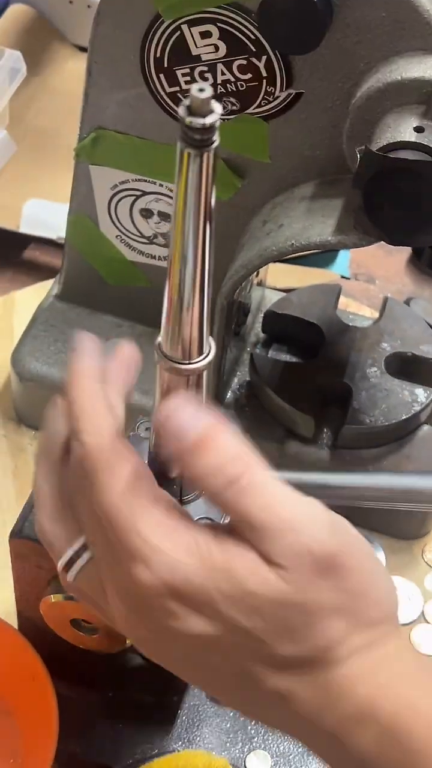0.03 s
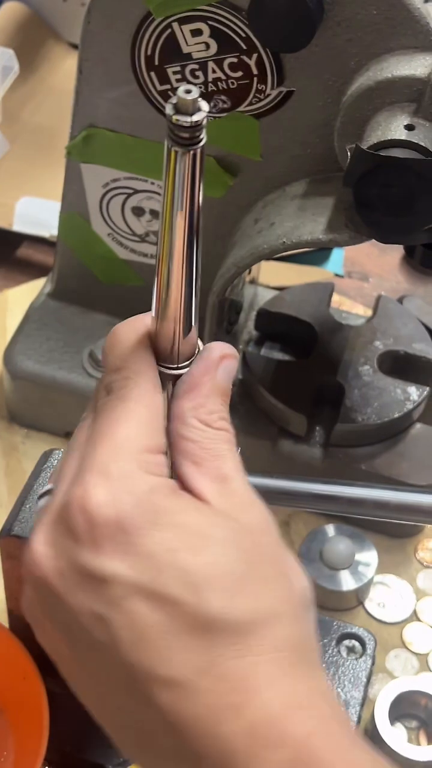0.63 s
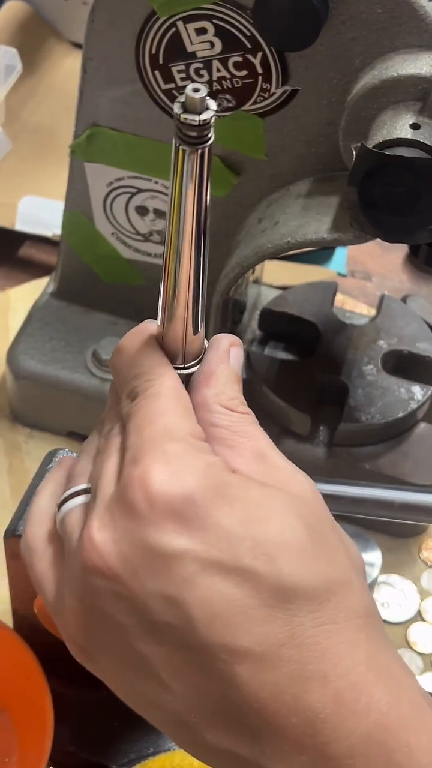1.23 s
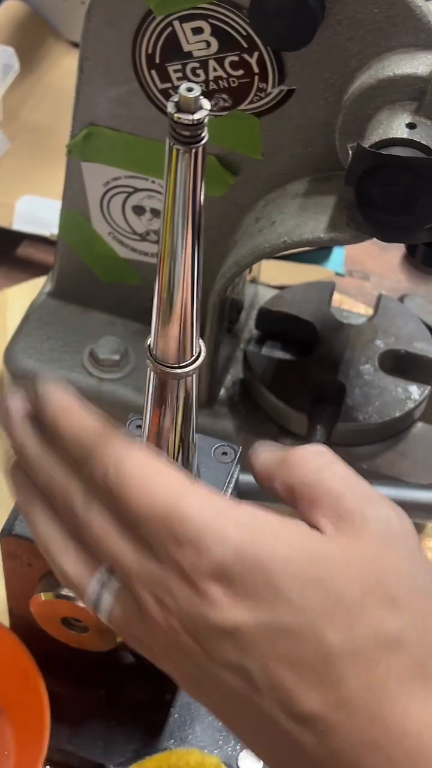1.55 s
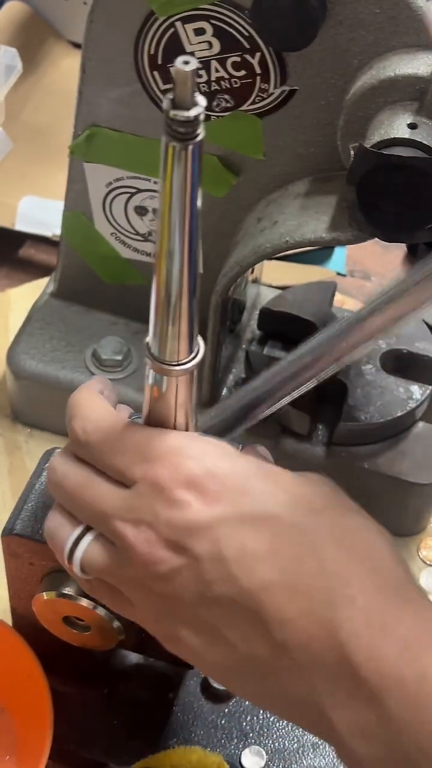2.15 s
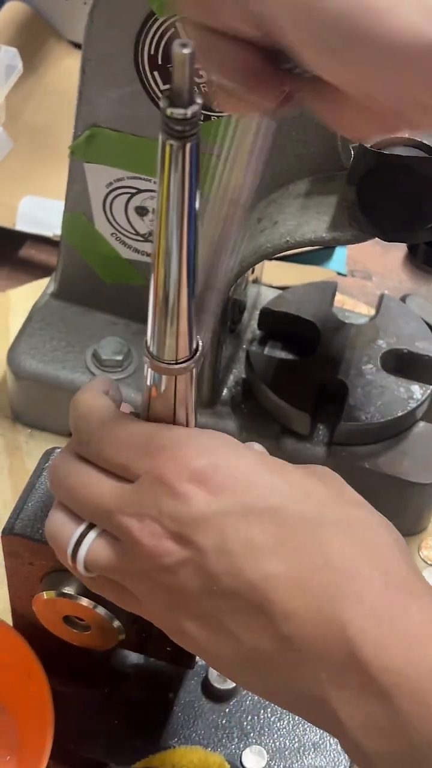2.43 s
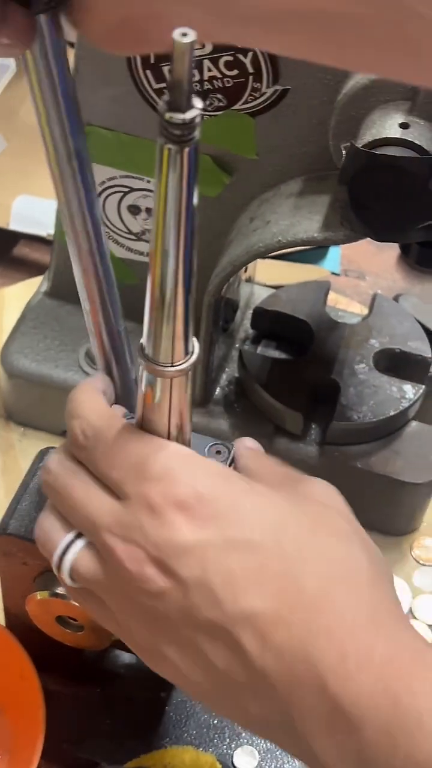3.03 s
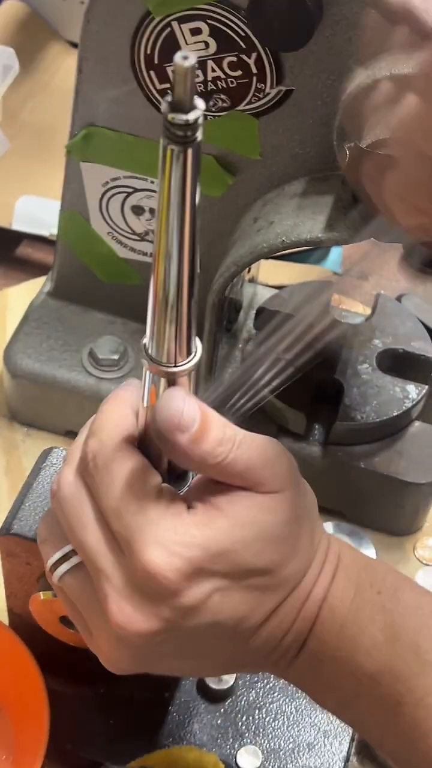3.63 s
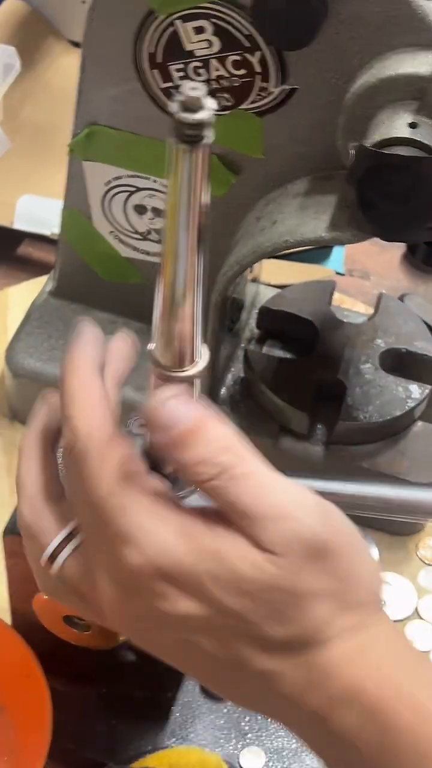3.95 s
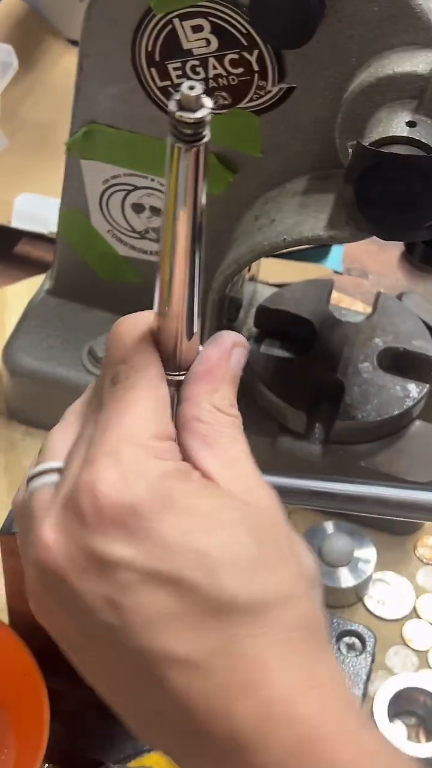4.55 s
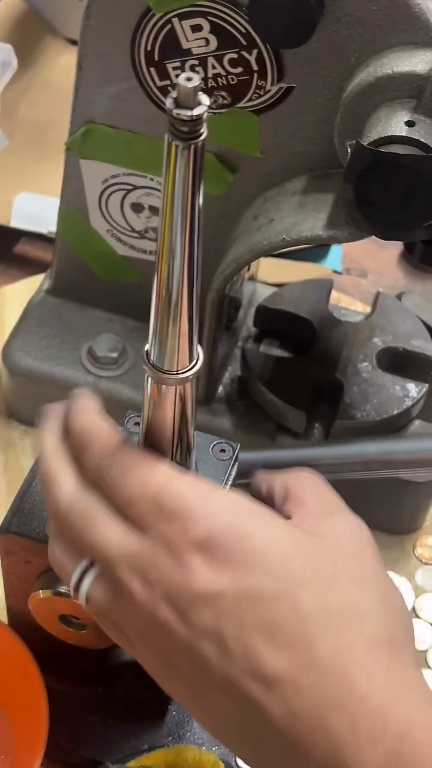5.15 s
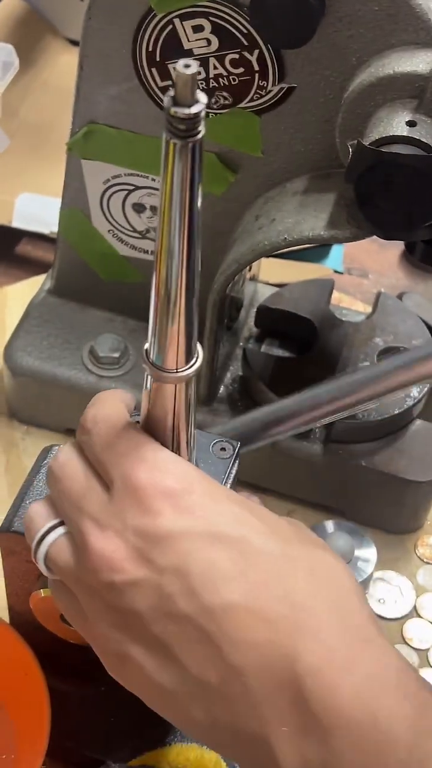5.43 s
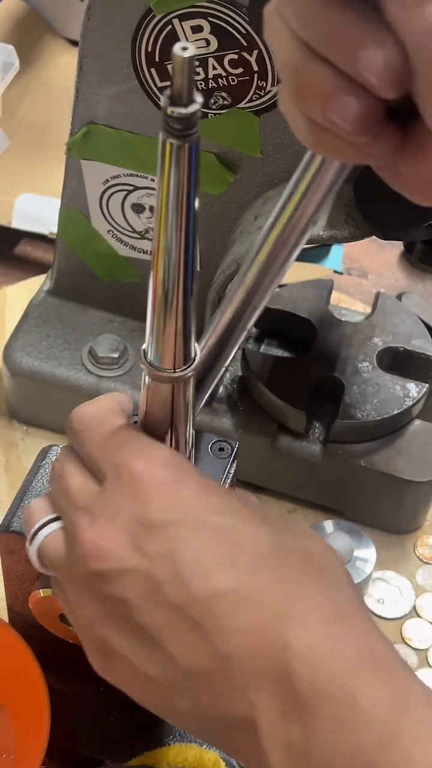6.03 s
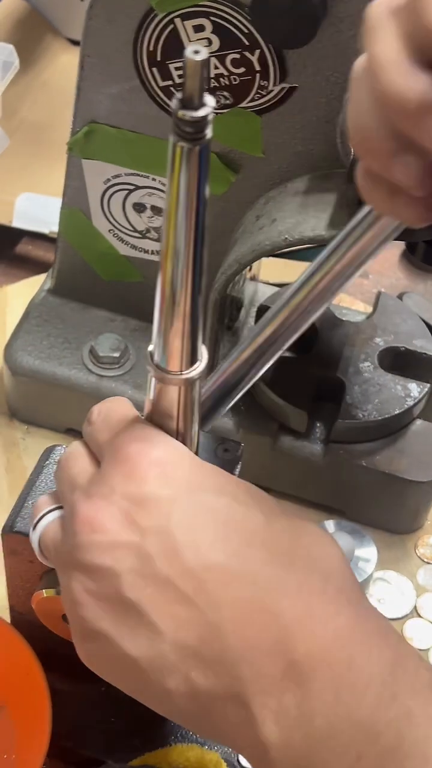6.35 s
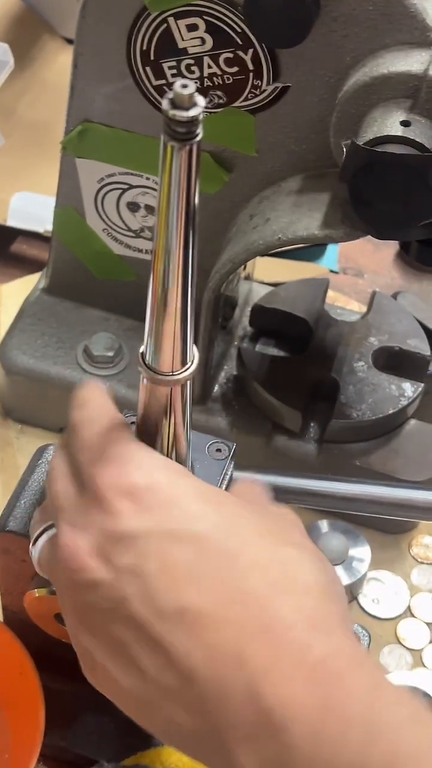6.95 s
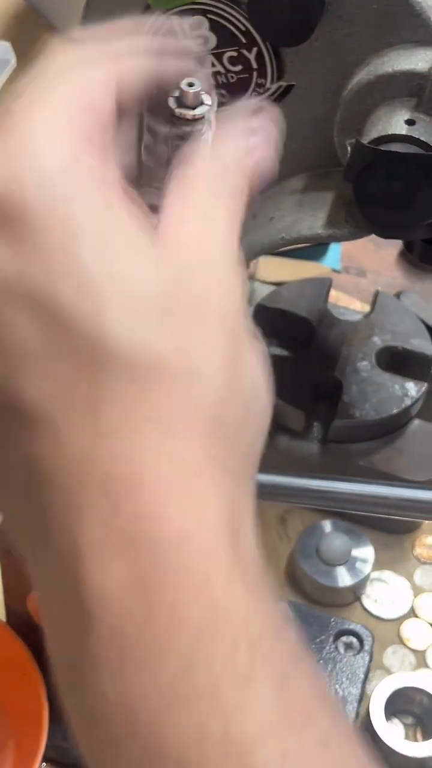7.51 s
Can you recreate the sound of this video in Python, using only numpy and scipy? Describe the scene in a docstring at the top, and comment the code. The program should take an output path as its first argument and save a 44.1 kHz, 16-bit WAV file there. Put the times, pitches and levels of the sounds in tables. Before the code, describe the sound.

A steel lever drops right at the start with a loud, ringing clunk, rattling loose parts and thudding through a wooden bench. Smaller knocks and bumps settle by about 1 second, with faint finger ticks on a metal ring. After a soft knock near 2 seconds, the lever is pulled from 2.4 seconds: it creaks and scrapes, with snapping metal catches and a string of light knocks until 3.8. At 4 seconds it falls with a heavy clunk and rocks briefly, rattling. Soft bumps and light ticks follow. A second pull near 5.9 seconds brings a short ratcheting creak and sharp clicks, then more knocks that build to a loud, bright clatter and thud at 7 seconds. One small knock and a faint rustle follow around 7.4. Everything is close, in a small workshop with a faint low hum.

```python
"""A lever-worked ring stretcher on a wooden bench, close by, in a small workshop with a low hum.
The lever drops and rocks on its rest: loose steel rattles, the cast frame rings, the bench thuds.
Fingers work the ring. At 2.4 s the lever is pulled: its pivot creaks and the split mandrel
sticks and slips as it spreads. At 4 s the lever falls back with a clunk. The ring is handled
again, a second pull follows at 5.9 s, and the last drop comes at 7 s."""
import sys
import numpy as np
from scipy import signal
from scipy.fft import rfft, irfft
from scipy.io import wavfile

SR = 44100
rng = np.random.default_rng(int(sys.argv[2]) if len(sys.argv) > 2 else 0)


def output_pcm(signal):
    """Save a mono or channel-first signal as 16-bit PCM at the path in sys.argv[1].

    Samples are clipped to [-1, 1] before scaling.
    """
    pcm = np.clip(np.atleast_2d(signal).T, -1, 1) * 32767
    wavfile.write(sys.argv[1], SR, np.round(pcm).astype(np.int16))


N = 343098
TIME = np.arange(N) / SR

# steel-on-steel blows: t/s, level/dB, f/Hz, rattle/dB, rattle t60/s, edge/dB
KNOCKS = [(0.0096, -12.5, 734, -20.5, 0.26, -9.5), (0.023, -6, 511, -20, 0.2, 1),
          (0.103, -25, 790, -27.5, 0.25, -14.5), (0.255, -23.5, 477, -32.5, 0.13, 5.5),
          (0.292, -29, 930, -29.5, 0.089, 6), (0.346, -27.5, 1042, -39, 0.092, -1),
          (0.504, -38, 374, -56, 0.065, 19), (0.552, -33, 1416, -38.5, 0.18, 0.5),
          (2.0143, -43, 862, -48.5, .09, -14.5), (2.053, -39.5, 610, -40.5, 0.15, -6),
          (2.432, -44, 950, -49, .3, -10), (2.475, -41, 936, -51, 0.7, -10),
          (2.526, -44, 880, -57.5, 0.078, -2), (2.758, -26.5, 820, -45.5, 0.34, 6),
          (2.838, -33, 380, -47, .06, 6), (2.94, -29.5, 846, -46, 0.36, -1),
          (3.037, -29.5, 840, -34.5, 0.2, 4.5), (3.212, -26, 1086, -31, 0.25, 3.5),
          (3.327, -29, 425, -36.5, 0.082, -3.5), (3.3523, -23.5, 683, -33, 0.27, -3),
          (3.548, -39.5, 1185, -47.5, 0.04, 9), (3.6168, -37.5, 1540, -43, .1, -1.5),
          (3.754, -33.5, 1290, -38.5, 0.086, 0.5), (3.826, -39, 1010, -39, 0.27, -2),
          (3.9345, -42, 1670, -29, 0.069, -6), (3.9496, -6, 766, -22.5, 0.09, -22),
          (3.956, -17.5, 660, -16, .11, -12.5), (3.961, -9.5, 920, -22, .05, -9),
          (3.974, -17.5, 1330, -20, 0.14, 1), (4.036, -23, 1770, -29, 0.06, -9),
          (4.736, -48.5, 1385, -53.5, 0.094, -14.5), (5.054, -45.5, 1223, -55.5, 0.099, 4),
          (5.4698, -40, 1410, -51, 0.048, -15.5), (5.519, -33.5, 1486, -37.5, .13, 1.5),
          (6.386, -29, 690, -42.5, 0.087, 4.5), (6.5961, -22, 813, -33, 0.19, -2.5),
          (6.68, -36.5, 1470, -44.5, 0.38, 0), (6.76, -25, 1728, -35.5, 0.083, 2),
          (6.895, -32.5, 1505, -41.5, .3, -5), (6.928, -23, 1776, -32.5, 0.39, 2.5),
          (6.951, -21.5, 2107, -27.5, 0.23, -1), (6.9845, -9.5, 1560, -22.5, 0.31, 3),
          (7.009, -4.5, 961, -15, 0.16, 1.5), (7.044, -10, 475, -18.5, 0.13, 7.5),
          (7.088, -15.5, 1425, -23.5, 0.29, 5), (7.352, -31, 1800, -29, 0.078, -3)]


def knocks(blow_t60_s=0.05, blow_db=-2, crack_t60_s=0.018, crack_db=-9, contact_s=0.0017):
    """Each blow rings the struck part briefly; its crack and the shaken loose parts ring the frame."""
    blows, contacts = np.zeros((2, N))
    t = TIME[:SR // 2]
    for s, db, hz, rattle_db, rattle_t60_s, edge_db in KNOCKS:
        part = sum(undb(partial_db) * np.sin(2 * np.pi * hz * ratio * t)
                   for ratio, partial_db in [(1, 1), (0.82, -11.5), (1.4, -8)])
        add(blows, s, undb(db + blow_db) * band(part * fade(t, blow_t60_s), 2 * hz, "low"))
        crack = undb(db + crack_db) * rng.standard_normal(len(t)) * fade(t, crack_t60_s)
        rattle = undb(rattle_db) * grains(len(t), per_s=2200, spread_db=-4.5)
        rattle *= fade(np.maximum(t - 0.008, 0), rattle_t60_s)
        onset = 1 - np.exp(-t / contact_s)  # greased faces meet gradually
        add(contacts, s, steel((crack + rattle) * onset, body_db=-1, edge_db=edge_db))
    return blows + frame(contacts)


# steel contact spectrum: f/Hz, level/dB
STEEL_SPECTRUM = [(60, -31), (150, -3.5), (300, 1.5), (550, 3), (950, 2), (1150, -2), (1700, -1.5),
                  (2500, -9.5), (3700, -17.5), (5000, -27.5), (7100, -39.5), (8800, -53.5), (9800, -65.5),
                  (15000, -72.5)]


def steel(x, body_db, edge_db):
    """Steel colour: heavy contacts have more body, sharp ones more edge."""
    hz, db = np.transpose(STEEL_SPECTRUM)
    corners_hz = [450, 900, 1900, 3800, 7000, 10000]
    tilt_db = np.interp(np.log(hz), np.log(corners_hz), [body_db, 0, 0, edge_db, edge_db, 0])
    return colour(x, np.column_stack([hz, db + tilt_db]))


# cast frame and lever modes: f/Hz, t60/s, level/dB
FRAME_MODES = [(203.6, 0.66, -3.5), (236, 0.75, -5), (312.9, 0.45, 1), (461, 0.96, 0.5), (530, 0.067, -3.5),
               (657, 0.32, -14.5), (772, 0.37, 2), (815, 0.18, -6), (969, 0.45, -0.5), (1213, 0.54, -8),
               (1378, .22, -1), (1444, 0.073, -11.5), (1535, 0.4, -4.5), (1660, 0.4, -8.5),
               (1700, 0.18, -10), (1810, .25, -8), (1960, 0.25, -5), (2290, 0.78, -8), (2270, 0.14, -5),
               (2584, 0.14, -3.5), (2670, 0.21, -4.5), (2790, .25, -5), (2960, 0.069, -9),
               (3190, 0.057, -6.5), (3490, 0.067, -4)]


def frame(force, gain_db=-1, ring_db=1):
    """Contacts sound directly and ring the cast frame."""
    return undb(gain_db) * (force + undb(ring_db) * resonate(force, FRAME_MODES))


# stick-slip runs: t/s, slip count, level/dB
SLIP_RUNS = [(2.608, 3, -35), (2.671, 1, -25.5), (2.685, 1, -30.5), (2.741, 1, -29.5), (2.807, 1, -26),
             (5.9091, 1, -31.5), (5.941, 1, -37.5), (5.9669, 5, -23.5), (6.061, 1, -27.5), (6.096, 1, -40),
             (6.1634, 1, -20.5), (6.215, 1, -36.5)]
# mandrel modes: f/Hz, t60/s, level/dB
MANDREL_MODES = [(947, 0.068, -9.5), (1256, 0.04, -5), (1780, 0.13, -10), (2157, 0.019, -0.5),
                 (2574, 0.037, -12.5), (2865, 0.032, -9.5), (3605, 0.072, -22), (4500, 0.032, -15),
                 (5040, 0.15, -30), (6700, .02, -64)]


def mandrel_slips(period_s=0.0169, snap_t60_s=0.0052, shake_t60_s=0.22, echo_s=0.0092,
                  ring_db=-4, snap_db=2, shake_db=-12, echo_db=-8):
    """Each slip snaps and rings the mandrel; the shock returns duller from the base and shakes it."""
    rings, snaps, shakes = np.zeros((3, N))
    t = TIME[:SR // 3]
    onset = np.minimum(t / 0.001, 1)
    for start_s, count, db in SLIP_RUNS:
        for slip in range(round(count)):
            s = start_s + slip * period_s
            ring = np.zeros(len(t))
            for k, (hz, t60_s, mode_db) in enumerate(MANDREL_MODES):
                gain = (-1) ** k * undb(db + mode_db + 2 * rng.standard_normal())
                ring += gain * np.sin(2 * np.pi * hz * t) * fade(t, t60_s)
            add(rings, s, undb(ring_db) * ring * onset)
            add(rings, s + echo_s, undb(echo_db) * band(ring, 1500, "low"))
            add(snaps, s, undb(db + snap_db) * rng.standard_normal(len(t)) * fade(t, snap_t60_s))
            add(shakes, s, undb(db + shake_db) * rng.standard_normal(len(t)) * fade(t, shake_t60_s))
    snaps = colour(snaps, [(200, 12), (900, -4), (2400, 0.5), (3800, 0), (5200, -18.5),
                           (7000, -22), (9500, -39), (15000, -61)])
    shakes = steel(shakes, body_db=-4.5, edge_db=5)
    return band(rings + snaps + shakes, 4300, "low")  # grease takes off the top


# lever pulls: t/s, length/s, level/dB
PULLS = [(2.41, 0.11, -76), (2.61, 0.3, -63), (3.08, 0.2, -70), (5.89, 0.45, -64)]
# loaded lever modes: f/Hz, t60/s, level/dB
LEVER_MODES = [(360.7, .08, 0.5), (856, .14, 1), (955, 0.28, 5), (1418, 0.12, -12), (1899, 0.2, 16),
               (2060, 0.15, -7), (2630, 0.23, 13), (3210, 0.18, -29)]
PULL_ATTACK_S = 0.01


def pivot_creak(top_hz=4000, release_t60_s=0.4):
    """Pivot friction keeps the lever singing while it is loaded."""
    friction = grains(N, per_s=1000, spread_db=1)
    singing = unit(band(resonate(friction, LEVER_MODES), top_hz, "low"))
    return singing * held(PULLS, PULL_ATTACK_S, release_t60_s)


# lever drops: t/s, first rock level/dB, loss per rock/dB, shake length/s
DROPS = [(0.035, -26, 14, 0.22), (3.96, -21.5, 4, .27), (7.014, -28, 18, 0.18)]


def lever_rocking(period_s=0.095, width_s=0.013, rocks=5):
    """The dropped lever rocks, weaker each time; loose parts clatter at each turn."""
    out, t = np.zeros(N), TIME[:SR // 4]
    swell = np.exp(-0.5 * ((t - t.mean()) / width_s) ** 2)
    for s, db, loss_db, _ in DROPS:
        for k in range(rocks):
            clatter = steel(grains(len(t), per_s=1500, spread_db=1) * swell, body_db=0, edge_db=-1)
            add(out, s + (k + 1) * period_s - t.mean(), undb(db - k * loss_db) * clatter)
    return out


def shaken(db, t60_s, attack_s=0.039):
    """Envelope of the shaking after each drop."""
    return held([(s, length_s, db) for s, _, _, length_s in DROPS], attack_s, t60_s)


# lever swings, then a faint, soft rush of noise after the last drop: t/s, length/s, level/dB
SLIDES = [(2.15, 0.082, -57), (2.58, 0.42, -49), (3.0, 0.64, -56.5), (3.355, 0.047, -31.5),
          (3.66, 0.032, -61), (3.9, 0.025, -47.5), (5.58, 0.16, -68), (5.78, .09, -60), (5.97, 0.16, -46),
          (6.33, 0.12, -53.5), (6.51, .12, -47.5), (6.92, 0.043, -32.5), (7.44, 0.19, -50.5)]


def scrape(gain_db=-2):
    """Steel slides on steel in small catches; after a drop, loose parts shiver and creep to rest."""
    sliding = held(SLIDES, attack_s=0.022, t60_s=0.26)
    shiver = shaken(db=-34.5, t60_s=0.5)
    creep = shaken(db=-55.5, t60_s=2.8)
    catches = grains(N, per_s=1200, spread_db=-0.5) * (sliding + shiver + creep)
    return undb(gain_db) * steel(catches, body_db=3, edge_db=1.5)


# blows reaching the bench: t/s, level/dB, f/Hz, rise/s, relative slap/dB
THUDS = [(0.02, -10, 95.6, 0.022, -4.5), (0.203, -33, 99, 0.024, -1), (0.359, -39, 140, 0.025, 1.5),
         (0.495, -36.5, 116.5, 0.022, -4), (0.565, -20.5, 105.2, 0.019, -14.5),
         (0.682, -40, 107.2, .016, -2.5), (0.826, -34, 121.4, 0.016, -14.5),
         (0.977, -44, 121.6, 0.026, -14), (1.095, -44.5, 116.5, .031, -11.5), (1.217, -52, 120.4, .02, -18),
         (1.657, -53, 105.5, 0.011, -28), (2.075, -31, 102.7, 0.018, -4.5),
         (2.079, -34.5, 190, 0.0095, -18), (2.823, -41, 102, 0.023, -28), (3.161, -40, 115.6, .026, -28),
         (3.626, -44.5, 123, 0.014, -8), (3.846, -23.5, 95.2, .027, -12.5), (3.96, -9, 98.7, 0.019, -8.5),
         (4.444, -22, 98.6, 0.014, -12.5), (4.681, -36, 117.5, 0.019, -23.5),
         (4.814, -33.5, 118.5, .016, -19), (5.531, -34.5, 115.3, .031, -16.5),
         (5.535, -31, 214, 0.01, -11.5), (6.364, -44, 114.5, 0.028, 6.5), (6.774, -27.5, 93.8, .022, -10),
         (6.935, -25, 116.4, 0.076, -4), (7.022, -9, 104, 0.024, -6), (7.369, -22, 94, 0.027, -12)]


def bench_thuds(glide=0.25, glide_s=0.014, slap_t60_s=0.16, rebound_s=0.06, rebound_db=-14):
    """The bench top booms and rebounds once; faster bending waves arrive first as a woody slap."""
    out, t = np.zeros(N), TIME[:SR // 2]
    wood = [(30, -31.5), (80, -10), (230, -4), (420, -7), (700, -18), (2000, -45), (8000, -76.5)]
    for s, db, hz, rise_s, slap_db in THUDS:
        pitch_hz = hz * (1 + glide * np.exp(-t / glide_s))
        phase = 2 * np.pi * np.cumsum(pitch_hz) / SR
        boom = np.sin(phase)
        for ratio, partial_db in [(0.75, -9.5), (1.3, -10), (2.3, -21.5)]:
            boom += undb(partial_db) * np.sin(ratio * phase + 2 * np.pi * rng.random())
        swell = t / rise_s * np.exp(0.5 - 0.5 * (t / rise_s) ** 2)
        slap = colour(rng.standard_normal(len(t)) * fade(t, slap_t60_s), wood)
        add(out, s, undb(db) * (boom * swell + undb(slap_db) * slap))
        add(out, s + rebound_s, undb(db + rebound_db) * boom * swell)
    return out


# light ticks of the ring, then the bright clatter of the last lever drop: t/s, level/dB
TICKS = [(0.6, -51), (0.685, -61), (1.071, -60.5), (4.462, -43), (4.572, -49.5), (4.599, -47.5),
         (4.843, -55.5), (4.924, -60), (5.157, -57), (5.205, -64), (5.272, -65), (6.795, -56), (7.033, -30),
         (7.089, -27.5), (7.113, -27)]


def ticks(rise_s=0.0005, t60_s=0.035, faint_per_s=9.7, over_grip_db=15, scatter_db=3):
    """Short, bright contacts of the ring and the last lever drop; handling adds faint random ticks."""
    out, t = np.zeros(N), TIME[:SR // 8]
    faint = [(s + length_s * rng.random(), db + over_grip_db + scatter_db * rng.standard_normal())
             for s, length_s, db in GRIPS for _ in range(round(length_s * faint_per_s))]
    envelope = fade(t, t60_s) * (1 - np.exp(-t / rise_s))
    for s, db in list(TICKS) + faint:
        add(out, s, undb(db) * rng.standard_normal(len(t)) * envelope)
    return colour(out, [(200, -15), (900, 1), (2200, 6.5), (4400, -1.5), (5500, -6.5),
                        (7500, -21), (10000, -32), (15000, -29.5)])


# fingers working the ring along the mandrel: t/s, length/s, level/dB
GRIPS = [(0.498, 0.63, -79), (4.588, 0.21, -78), (5.041, 0.33, -90.5), (7.31, 0.27, -76.5)]
GRIP_ATTACK_S = 0.014


def finger_rustle(release_t60_s=1):
    """Dry fingertips cross polished steel in tiny catches."""
    catches = grains(N, per_s=630, spread_db=3) * held(GRIPS, GRIP_ATTACK_S, release_t60_s)
    return colour(catches, [(200, 0), (1200, 0), (3000, 5.5), (5000, -4), (7500, -22),
                            (10000, -18), (15000, -33)])


# bench rumble spectrum: f/Hz, level/dB
RUMBLE_SPECTRUM = [(25, -25), (50, -7), (78, -7), (100, -1), (135, 0), (170, -20), (260, -39.5), (510, -45),
                   (1100, -56.5), (7000, -65)]


def bench_rumble(over_pull_db=12.5, over_grip_db=24.5, strain_t60_s=0.51):
    """The bench rumbles after each drop and while lever or hand strains it."""
    drops = shaken(db=-38, t60_s=0.97)
    lever = undb(over_pull_db) * held(PULLS, PULL_ATTACK_S, strain_t60_s)
    hand = undb(over_grip_db) * held(GRIPS, GRIP_ATTACK_S, strain_t60_s)
    return colour(rng.standard_normal(N), RUMBLE_SPECTRUM) * (drops + lever + hand)


def room(x):
    """Diffuse tail of a small workshop; the mids linger longest."""
    tail, t = np.zeros(SR), TIME[:SR]
    onset = np.minimum(t / 0.015, 1)
    for hz, kind, t60_s, db in [(170, "low", 0.31, -15), ([170, 2000], "band", 0.57, -12),
                                (2000, "high", 0.15, -13)]:
        echoes = rng.standard_normal(len(t)) * fade(t, t60_s) * onset
        tail += undb(db) * band(echoes / np.linalg.norm(echoes), hz, kind)
    return x + signal.fftconvolve(x, tail)[:N]


# workshop hum spectrum: f/Hz, level/dB
HUM_SPECTRUM = [(25, -21.5), (50, -19.5), (78, -2), (100, -1.5), (135, -4), (170, -27), (260, -32.5),
                (510, -44), (1100, -53.5), (7000, -67)]
# hum envelope: t/s, level/dB
HUM_LEVELS = [(1.25, -54.5), (1.96, -78.5), (2.08, -57.5)]


def hum(tone_hz=98, tone_db=-5, hiss_db=-87):
    """Low noise and one tone, dipping once near 2 s, over a trace of steady hiss."""
    drone = colour(rng.standard_normal(N), HUM_SPECTRUM)
    tone = undb(tone_db) * np.sin(2 * np.pi * tone_hz * TIME)
    level_db = np.interp(TIME, *np.transpose(HUM_LEVELS))
    hiss = colour(rng.standard_normal(N), [(200, 3.5), (1500, 6), (7000, 1), (9500, -11), (15000, 2)])
    return (drone + tone) * undb(level_db) + undb(hiss_db) * hiss


def undb(db):
    """Decibels to gain."""
    return 10 ** (np.asarray(db) / 20)


def unit(x):
    """Scale to rms 1."""
    return x / np.sqrt(np.mean(x ** 2))


def fade(t, t60_s):
    """Exponential decay, 60 dB in t60_s."""
    return np.exp(-np.log(1000) * t / max(t60_s, 1e-3))


def held(rows, attack_s, t60_s):
    """Attack-hold-release envelope from rows of t/s, length/s, level/dB."""
    return sum(undb(db) * np.clip((TIME - s) / attack_s, 0, 1)
               * fade(np.maximum(TIME - s - length_s, 0), t60_s) for s, length_s, db in rows)


def add(track, s, sound):
    """Mix a sound into the track at time s."""
    i = max(int(s * SR), 0)
    track[i:i + len(sound)] += sound[:max(N - i, 0)]


def grains(count, per_s, spread_db):
    """Tiny random contacts of uneven size, rms 1."""
    hits = rng.random(count) < per_s / SR
    signs = rng.choice([-1, 1], count)
    sizes = undb(spread_db * np.minimum(rng.exponential(size=count), 4))
    return unit(hits * signs * sizes)


def band(x, hz, kind):
    """Gentle causal filter."""
    return signal.sosfilt(signal.butter(2, hz, kind, fs=SR, output="sos"), x)


def colour(x, points, size=4096):
    """Minimum-phase filter of unit power through points of f/Hz, level/dB."""
    hz, db = np.transpose(points)
    bins_hz = np.arange(size // 2 + 1) * SR / size + 1
    gains = undb(np.interp(np.log(bins_hz), np.log(hz), db))
    cepstrum = irfft(np.log(gains))
    cepstrum[1:size // 2] *= 2
    cepstrum[size // 2 + 1:] = 0
    response = irfft(np.exp(rfft(cepstrum)))
    return signal.fftconvolve(x, response / np.linalg.norm(response))[:len(x)]


def resonate(force, modes):
    """Drive modes of f/Hz, t60/s, level/dB (gain at resonance)."""
    t = TIME[:SR // 2]
    ring = sum(undb(db) * np.cos(2 * np.pi * hz * t) * fade(t, t60_s) * 2 * np.log(1000) / (t60_s * SR)
               for hz, t60_s, db in modes)
    return signal.fftconvolve(force, ring)[:N]


def scene():
    """Tool, hand and bench in the room, over rumble and hum; mono."""
    tool = knocks() + frame(lever_rocking() + mandrel_slips() + scrape()) + pivot_creak()
    workshop = room(tool + ticks() + finger_rustle() + bench_thuds())
    return (workshop + bench_rumble() + hum())[None]


def record(dry, low_cut_hz=45, drive=0.8, top_hz=15600):
    """The microphone drops the deepest bass, rounds the loudest peaks and cuts the top."""
    rounded = np.tanh(drive * band(dry, low_cut_hz, "high")) / drive
    return signal.sosfilt(signal.ellip(8, 0.2, 70, top_hz, fs=SR, output="sos"), rounded)


dry = scene()
out = record(dry)
output_pcm(out)
```